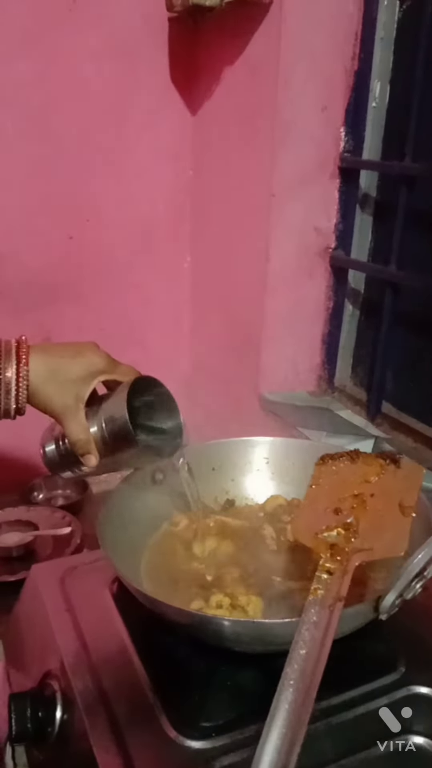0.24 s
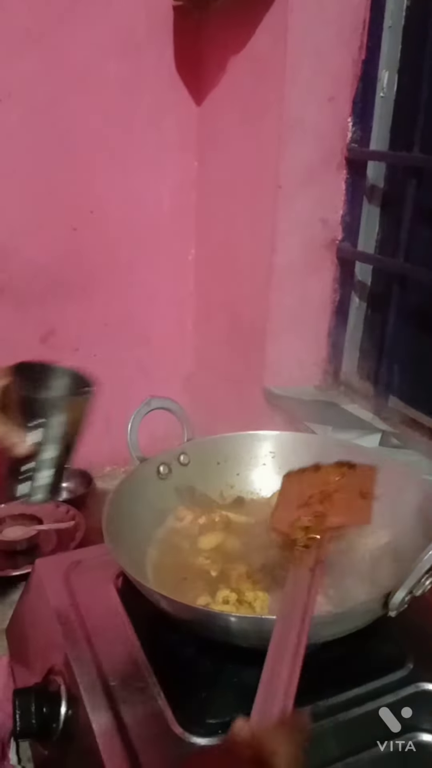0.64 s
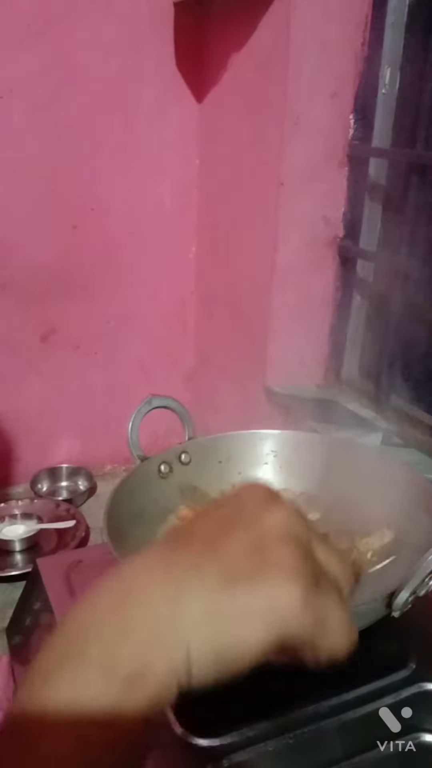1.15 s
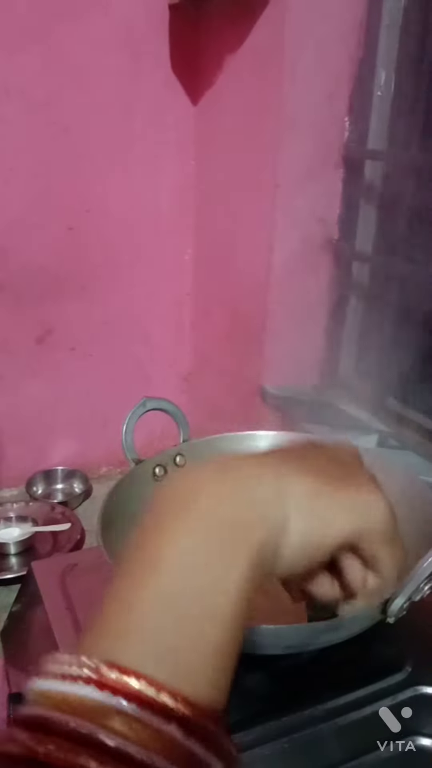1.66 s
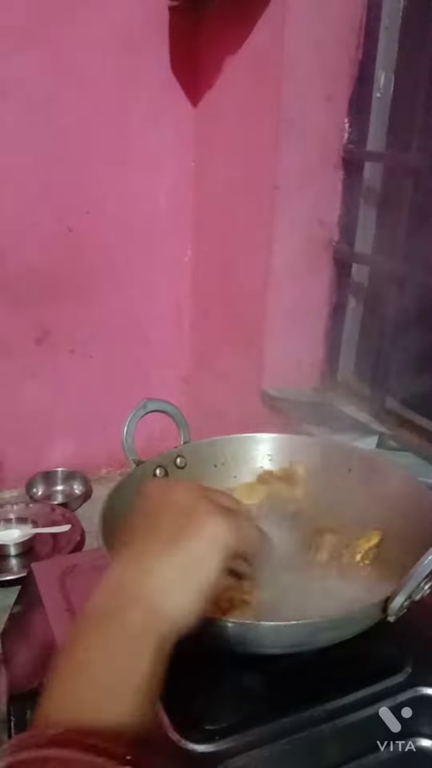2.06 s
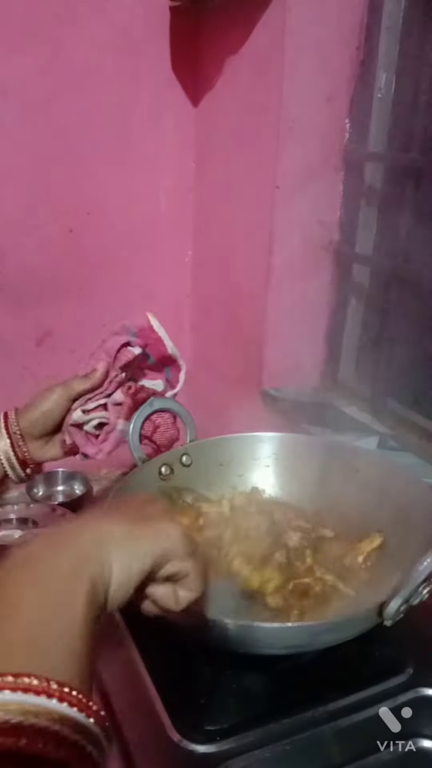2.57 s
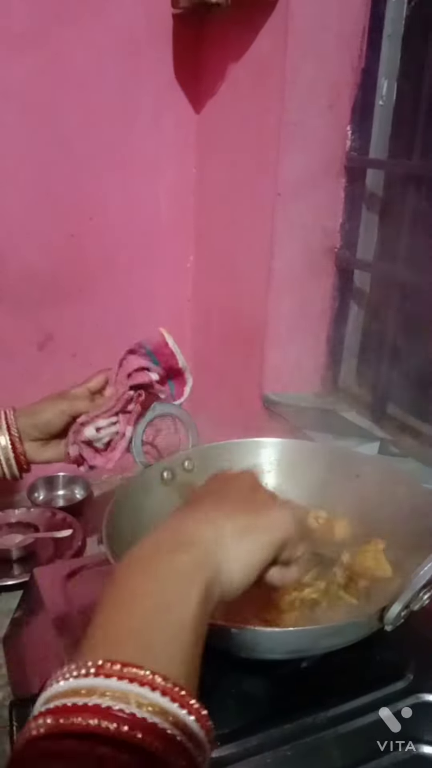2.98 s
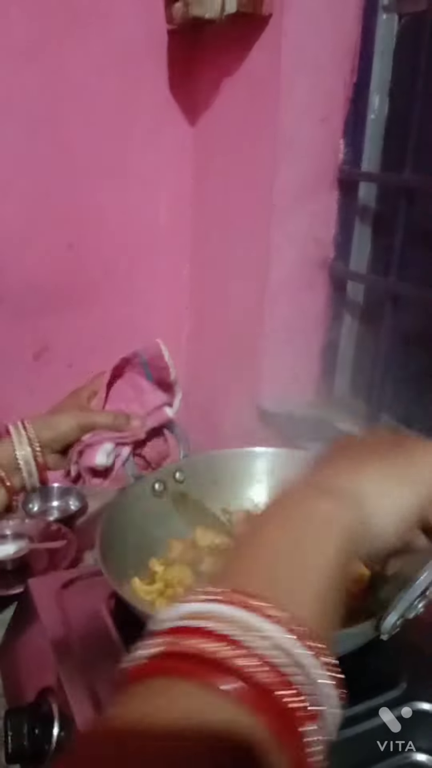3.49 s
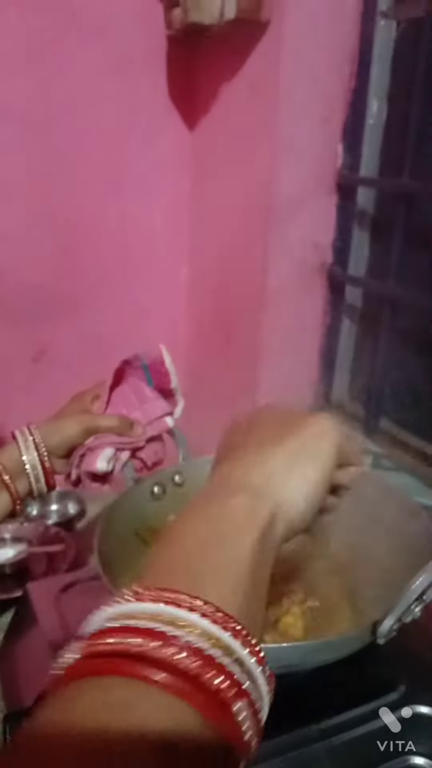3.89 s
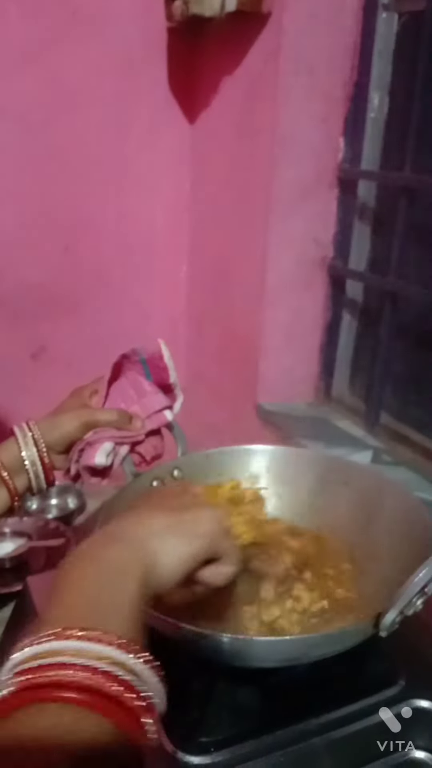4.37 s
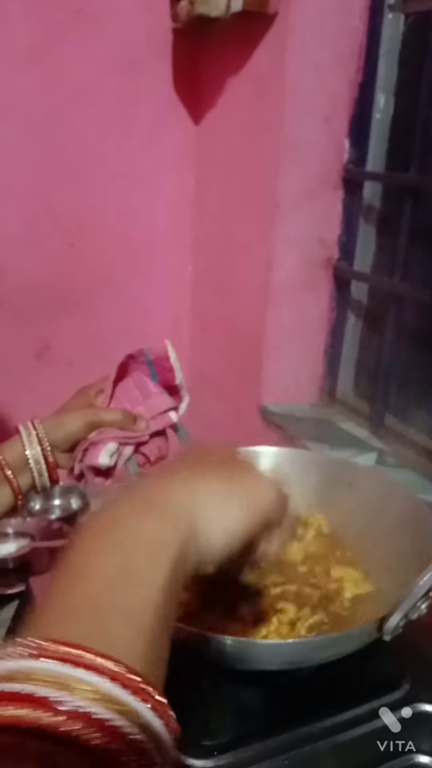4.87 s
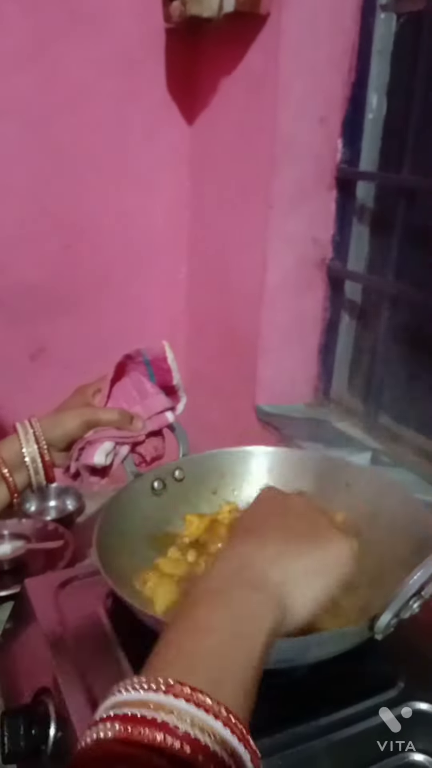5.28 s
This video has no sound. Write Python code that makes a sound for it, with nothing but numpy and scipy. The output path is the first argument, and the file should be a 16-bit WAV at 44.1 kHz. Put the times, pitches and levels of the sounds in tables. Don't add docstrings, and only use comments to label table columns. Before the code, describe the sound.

Close phone sound in a small hard-walled kitchen: wet frying hiss full of crackling steam bubbles, loudest at the start. A metal cup is set down early with a double tap and softer settling. Stirring follows, with scrapes, dull pan knocks, low rumble and short bright spits, over a faint burner drone. The sizzle rises and falls, finally easing.

```python
import sys
import numpy as np
from scipy import signal
from scipy.fft import rfft, irfft, next_fast_len
from scipy.io import wavfile
from scipy.ndimage import uniform_filter1d

SR = 44100
rng = np.random.default_rng(int(sys.argv[2]) if len(sys.argv) > 2 else 0)


def boost(x):
    u = np.asarray(x, float) / 20
    return 10 ** u


def wav_record(signal):
    frames = np.transpose(np.atleast_2d(signal))
    bounded = np.clip(frames, -1, 1)
    quanta = np.round(bounded * 32767).astype(np.int16)
    wavfile.write(sys.argv[1], SR, quanta)


N = 244161
SECONDS = np.arange(N) / SR

# (time [s], stand rumble [dB], flame drone [dB])
SHOVES = [(0.0, -43, -74), (.16, -53, -50), (.31, -46, -44), (.55, -50.5, -42), (.83, -49, -36),
          (1.02, -49.5, -48), (1.17, -51, -91), (1.39, -48, -84), (2.02, -49, -55), (2.17, -46.5, -62),
          (1.6, -65, -64), (2.5, -64, -66), (2.78, -59, -67), (3.0, -60, -60), (3.14, -64, -62),
          (3.36, -57, -77), (3.65, -61, -56), (3.9, -55.5, -76), (4.16, -64, -70), (4.32, -62, -59),
          (4.5, -54.5, -52), (4.66, -49.5, -63), (5.07, -56, -70), (5.26, -57, -55), (5.54, -53.5, -89)]
# (time [s], peak [dB], thump [Hz], judder length [s], clank over knock [dB])
KNOCKS = [(1.164, -50, 317, 0.091, -8), (1.314, -35.5, 258, 0.043, -10), (1.866, -42.5, 295, 0.11, 1),
          (2.117, -39.5, 260, 0.059, -16), (2.908, -40.5, 335, 0.021, -3), (2.916, -40.5, 293, 0.043, -13),
          (2.969, -48.5, 320, 0.13, -17), (3.078, -37, 246, 0.12, -10), (3.132, -52, 257, 0.12, -18),
          (3.28, -45, 315, 0.08, -15), (3.308, -44, 313, 0.059, -15), (3.57, -48.5, 301, 0.046, 2),
          (3.755, -45, 242, 0.13, -8), (3.821, -42, 215, 0.066, -4), (4.034, -40, 226, 0.054, -6),
          (4.234, -50, 276, 0.073, -21), (4.441, -49, 316, 0.066, -19), (4.615, -40, 275, 0.074, 3),
          (4.79, -39.5, 222, 0.092, -13), (5.135, -47.5, 292, 0.065, 1), (5.421, -51, 243, 0.04, -2)]
# (frequency [Hz], width [Hz], level [dB])
STAND_TONES = [(165, 54, -6.5), (232, 61, 7), (315, 30, 9.5), (451, 83, 2)]
# (frequency [Hz], level [dB], time to fall 60 dB [s])
CLANK_TONES = [(690, 8.5, 0.091), (829, 15, 0.031), (1050, -34, .12)]
# (time [s], ring [dB], dulling [dB per octave from centre], rattle [dB])
TUMBLER_TOUCHES = [
    (.7905, -8.5, 0, -25),
    (.7965, -15, -2, -32),
    (.938, -13, -14, -46),
    (.9515, -14, -20, -50),
]
# (frequency [Hz], level [dB], time to fall 60 dB [s])
COUNTER_TONES = [(226, 7, 0.13), (258, 8, 0.093), (421, 5.5, 0.094), (454, 0, 0.05), (566, -11, 0.13),
                 (690, 2.5, 0.091), (785, -2, 0.082), (940, -1, 0.07), (1063, 7, 0.03), (1154, -3, 0.2),
                 (1222, 7, 0.065), (1323, 2, 0.061), (1560, -1, 0.066), (1900, 0, .07)]
# (time [s], level [dB], time to fall 60 dB [s])
SPITS = [(2.664, -41, 0.065), (2.7394, -33, 0.03), (2.8544, -26, 0.13), (3.3594, -37, 0.092),
         (4.009, -25, 0.076), (4.401, -30, .05), (4.6054, -19.5, 0.056), (4.78, -42, 0.044),
         (4.842, -32, .05), (5.1193, -25.5, .11), (5.2294, -38, 0.061)]
# (time [s], ringing [dB])
SCRAPES = [(.28, -29), (.66, -23.5), (.8, -25.5), (1.29, -25.5), (1.62, -27), (2.05, -30), (2.47, -27),
           (2.82, -23.5), (3.08, -25), (3.38, -23.5), (3.62, -23), (3.93, -28), (4.05, -23.5), (4.22, -40),
           (4.52, -20.5), (4.74, -22), (5.13, -29.5), (5.32, -28), (5.47, -27)]
# (frequency [Hz], width [Hz], level [dB])
WALL_TONES = [(634, 16, -12.5), (810, 200, -22.5), (1124, 34, -7.5), (1283, 90, -7), (1723, 60, -4),
              (1885, 73, -4), (2196, 79, -13), (2360, 69, -21), (2550, 42, -4.5), (2784, 97, -5),
              (3145, 16, -4.5), (3527, 160, -2.5), (3797, 270, 6.5), (4360, 69, -6), (5750, 97, -10)]
# (time [s], sizzle [dB], water pooled under the food [dB])
BOIL = [(0.0, -22, -3), (0.77, -23, -2), (0.87, -26.5, -1), (1.9, -26.5, -1), (2.45, -30.5, 0.5),
        (2.56, -26.5, -6), (2.82, -25, -3.5), (3.21, -29.5, 2), (3.37, -25.5, 0.5), (3.62, -24.5, -5.5),
        (3.86, -30.5, 7.5), (4.0, -23, -8.5), (4.24, -21.5, -7.5), (4.42, -26.5, 1), (4.56, -23, -5),
        (5.09, -32, -4), (5.38, -27, 1.5), (5.54, -32.5, 4)]
# (time [s], depth [dB])
DOUSES = [
    (1.4, 2),
    (3.15, -0.5),
    (3.49, 1),
    (4.1, 1.5),
    (4.74, 2.5),
    (5.07, 0),
    (5.2, 0),
]
# (frequency [Hz], level [dB per Hz])
SIZZLE_COLOUR = [(290, -29.5), (500, -20), (680, -12), (1050, -12), (1250, -5.5), (1550, -8), (1780, -6.5),
                 (2400, -9.5), (3100, -4.5), (3810, -1), (4500, -1.5), (4900, -5), (5800, -1), (6400, -4)]
# (frequency [Hz], gain [dB])
MIC_COLOUR = [(6400, -0.5), (7700, 1.5), (8550, -4), (9200, -12.5), (10700, -11.5), (11350, -13),
              (12400, -5), (14300, -3.5), (15700, -3.5)]
HISS_PATCHES = [.036, .429, .43, .479, .547, .548, .549, .618, .62, .733, 1.5, 2.639, 2.782, 3.38, 3.382,
                3.385, 3.496, 3.614, 4.985, 5.261, 5.263]


def set_level(x, db):
    return x * boost(db) / np.sqrt(np.mean(x ** 2))


def curves(table):
    times, *columns = np.transpose(table)
    return [np.interp(SECONDS, times, column) for column in columns]


def resonate(x, hz, width_hz):
    return signal.lfilter(*signal.iirpeak(min(hz, 0.45 * SR), hz / width_hz, fs=SR), x)


def band(x, low_hz, high_hz):
    edges = [low_hz, min(high_hz, 0.45 * SR)]
    return signal.sosfilt(signal.butter(4, edges, "band", fs=SR, output="sos"), x)


def walk(rate):
    hold = int(SR / rate)
    steps = np.repeat(rng.standard_normal(N // hold + 1), hold)
    return 1.37 * uniform_filter1d(uniform_filter1d(steps, hold), hold)[:N]


def swells(times, peaks_db, rise_db_per_s, fall_db_per_s):
    age = SECONDS - np.array(times)[:, None]
    slope = np.where(age < 0, rise_db_per_s, -fall_db_per_s) * age
    return np.max(np.array(peaks_db)[:, None] + slope, axis=0)


def puffs(table, trim_db):
    shape = np.zeros(N)
    for start, db, t60 in table:
        age = SECONDS - start
        shape += (age > 0) * boost(db + trim_db - 60 * np.maximum(age, 0) / t60)
    return shape


def add_struck_tone(out, start_s, hz, t60, db):
    first = int(start_s * SR)
    t = SECONDS[:min(int(t60 * SR), N - first)]
    swell = 1 - np.exp(-t * hz * 2)
    out[first:first + len(t)] += boost(db - 60 * t / t60) * swell * np.sin(2 * np.pi * hz * t)


def bursts(per_s, spread_db):
    when, size, sign = rng.random((3, N))
    strength = boost(-spread_db * np.log(1 - size)) * np.sign(sign - 0.5)
    return set_level((when < per_s / SR) * strength, 0)


def kitchen(x, wet_db):
    t60_s = 0.3
    t = SECONDS[:int(0.5 * SR)]
    tail = rng.standard_normal(len(t)) * boost(-60 * t / t60_s) * (t > 0.006)
    tail = band(tail, 107, 5700) + 0.63 * tail
    return x + boost(wet_db) * signal.fftconvolve(x, tail / np.sqrt(np.sum(tail ** 2)))[:N]


def shoving():
    times, rumble_db, drone_db = np.transpose(SHOVES)
    return swells(times, rumble_db, 73, 110), swells(times, drone_db, 167, 218)


def flame(drone_db):
    low = resonate(resonate(rng.standard_normal(N), 99, 14), 99, 24)
    high = resonate(resonate(rng.standard_normal(N), 134, 30), 150, 40)
    drone = set_level(low, 0) + set_level(high, -7)
    air = boost(3.2 * walk(9)) * band(rng.standard_normal(N), 30, 190)
    return boost(drone_db - 4.5) * set_level(drone, 0) + set_level(air * boost(0.11 * drone_db), -72.5)


def stand(rumble_db):
    drag = bursts(900, 2.0)
    rumble = np.zeros(N)
    for hz, width_hz, db in STAND_TONES:
        rumble += boost(db) * resonate(resonate(drag, hz, width_hz), hz, 2 * width_hz)
    knocks, judder = np.zeros(N), boost(rumble_db - 1)
    for start, db, thump_hz, length_s, clank_db in KNOCKS:
        age = SECONDS - start
        onset = np.clip(age / 0.021, 0, 1)
        unseated = 1 / (1 + np.exp(np.clip((age - length_s) / 0.007, -30, 30)))
        judder = judder + onset * unseated * boost(db - 7.0 - 9.9 * np.maximum(age, 0))
        add_struck_tone(knocks, start - 0.004, thump_hz, 0.14, db + 8)
        for hz, share_db, t60 in CLANK_TONES:
            add_struck_tone(knocks, start - 0.004, hz, t60, db + clank_db + share_db)
    return band(knocks, 227, 3000) + judder * set_level(rumble, 0)


def tumbler():
    rattles = [(start, rattle_db, 0.22) for start, _, _, rattle_db in TUMBLER_TOUCHES]
    out = band(puffs(rattles, 14.8) * rng.standard_normal(N), 237, 1200)
    for start, ring_db, dulling_db, _ in TUMBLER_TOUCHES:
        for hz, share_db, t60 in COUNTER_TONES:
            octaves_off = abs(np.log2(hz / 600))
            add_struck_tone(out, start, hz, t60, ring_db - 12 + share_db + dulling_db * octaves_off)
    return band(out, 300, 3200)


def spits(hiss):
    return puffs(SPITS, 3) * band(hiss, 2600, 9500)


def wall(sizzle_db):
    scraped_db = swells(*np.transpose(SCRAPES), 123, 50)
    ringing_db = np.maximum(scraped_db, sizzle_db - 3)
    shake = bursts(3000, 1.8) + rng.standard_normal(N)
    low, high = boost(ringing_db - 6), boost(sizzle_db - 12.0)
    ring = np.zeros(N)
    for hz, width_hz, db in WALL_TONES:
        drive = low if hz < 2500 else high
        damping_db = 1.8 * walk(9)
        ring += drive * boost(db - 6.5 + damping_db) * set_level(resonate(shake, hz, width_hz), 0)
    return band(ring, 657, 20400)


def boiling():
    sizzle_db, pooled_db = curves(BOIL)
    douse_s = 0.08
    doused_db = sum(db * np.exp(-((SECONDS - start) / douse_s) ** 2) for start, db in DOUSES)
    return sizzle_db - doused_db, pooled_db


def sizzle(spray_db, gurgle_db):
    length = next_fast_len(N, True)
    spectrum = rfft(bursts(14000, 1.3) + 0.8 * rng.standard_normal(N), length)
    octave = np.log2(np.maximum(np.arange(len(spectrum)) * SR / length, 1))
    hz, db = np.transpose(SIZZLE_COLOUR)
    spectrum = spectrum * boost(np.interp(octave, np.log2(hz), db, left=-90))
    out, surge, shared = np.zeros(N), 0.5 * walk(22), walk(12)
    for centre in np.arange(8.5, 14.5, 0.5):
        window = np.cos(np.pi * np.clip(octave - centre, -0.5, 0.5)) ** 2
        size_class = irfft(spectrum * window, length)[:N]
        shared = 0.8 * shared + 0.6 * walk(12)
        fine = np.clip(centre - 12.5, 0, 1)
        coarse = np.clip(10.2 - centre, 0, 1)
        patchy = (0.8 + 2.1 * coarse) * walk(18)
        flicker = patchy + coarse * (gurgle_db - gurgle_db.mean())
        spray = fine * (spray_db - spray_db.mean())
        out += size_class * boost(surge + shared / 2 + flicker + spray)
    return set_level(out, 0)


def scene():
    rumble_db, drone_db = shoving()
    sizzle_db, pooled_db = boiling()
    spray_db = -0.26 * sizzle_db - 2.5 * np.maximum(SECONDS - 4.4, 0)
    gurgle_db = pooled_db + 0.25 * rumble_db
    hiss = sizzle(spray_db, gurgle_db)
    pan = kitchen(boost(sizzle_db + 4.0) * hiss + wall(sizzle_db), -11)
    set_down = kitchen(tumbler(), -18)
    mono = flame(drone_db) + stand(rumble_db) + set_down + spits(hiss) + pan
    return np.array([mono, mono])


def phone(x):
    hz, _, cells = signal.stft(x, SR, nperseg=1024, noverlap=768)
    power = uniform_filter1d(uniform_filter1d(abs(cells) ** 2, size=3, axis=0), size=3, axis=1)
    quiet_db = -75 + 13.5 * np.log2(np.maximum(hz, 160) / 300)
    keep = power / (power + boost(2 * quiet_db)[:, None])
    bass = (hz[:, None] < 670) & (hz[:, None] > 160)
    cells *= np.where(bass, keep, 1)
    cells *= (boost(np.interp(hz, *np.transpose(MIC_COLOUR))) * (hz < 15740))[:, None]
    holes_per_s = 6
    for when, where in rng.random((int(holes_per_s * N / SR), 2)):
        row = int((9200 + 2400 * where) / hz[1])
        column = int(when * cells.shape[1])
        cells[row:row + 11, column:column + 4] *= 0.15
    return signal.istft(cells, SR, nperseg=1024, noverlap=768)[1][:N]


def hiss_patches(x):
    side, fade = np.zeros(N), np.hanning(1600)
    half = len(fade) // 2
    hz = np.arange(half + 1) * SR / len(fade)
    lows_hz = rng.permutation(np.linspace(4200, 14400, len(HISS_PATCHES)))
    for middle, low_hz in zip(HISS_PATCHES, lows_hz):
        span = slice(int(middle * SR) - half, int(middle * SR) + half)
        inside = (hz > low_hz) & (hz < low_hz + 1500)
        heard = np.std(irfft(rfft(x[span]) * inside))
        fresh = irfft(rfft(rng.standard_normal(len(fade))) * inside)
        side[span] += fade * heard * set_level(fresh, -0.97)
    return side


def band_limit(x):
    return signal.sosfilt(signal.butter(12, 17060, fs=SR, output="sos"), x)


def record(dry):
    heard = phone(dry[0])
    side = hiss_patches(heard)
    mix = heard + np.array([side, -side])
    return band_limit(mix)


dry = scene()
out = record(dry)
wav_record(out)
```